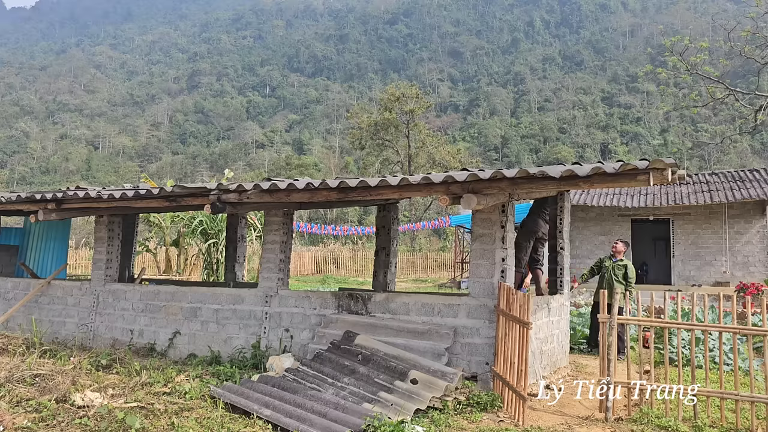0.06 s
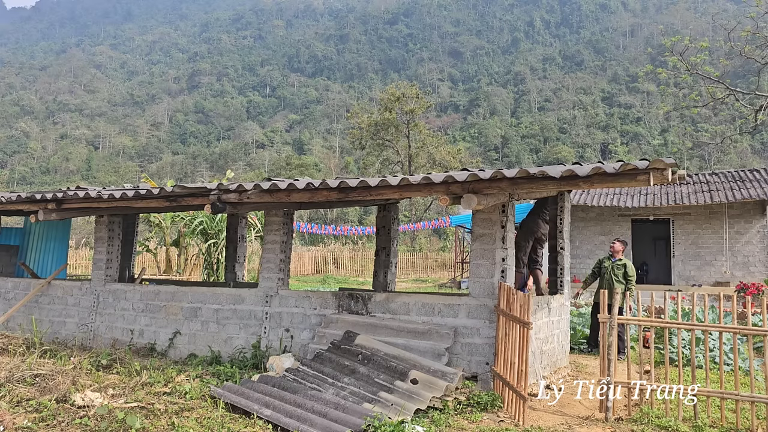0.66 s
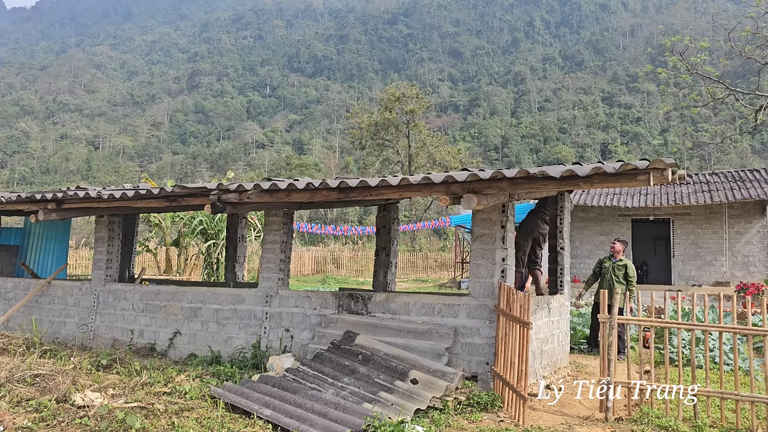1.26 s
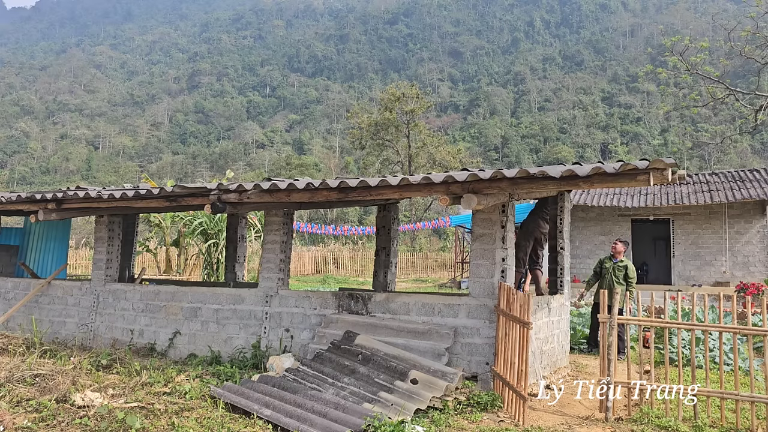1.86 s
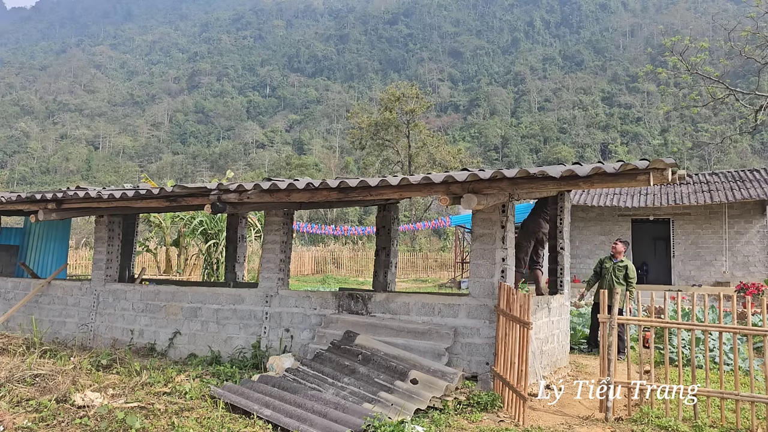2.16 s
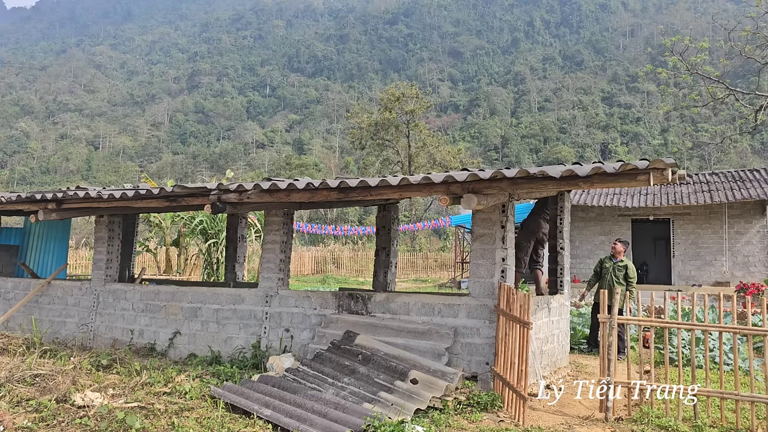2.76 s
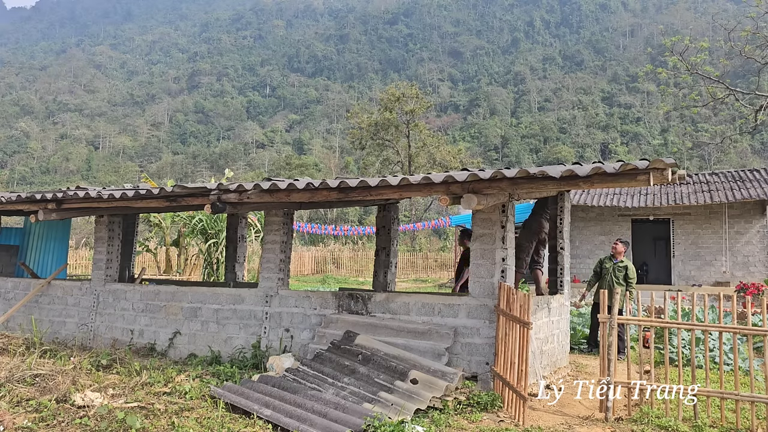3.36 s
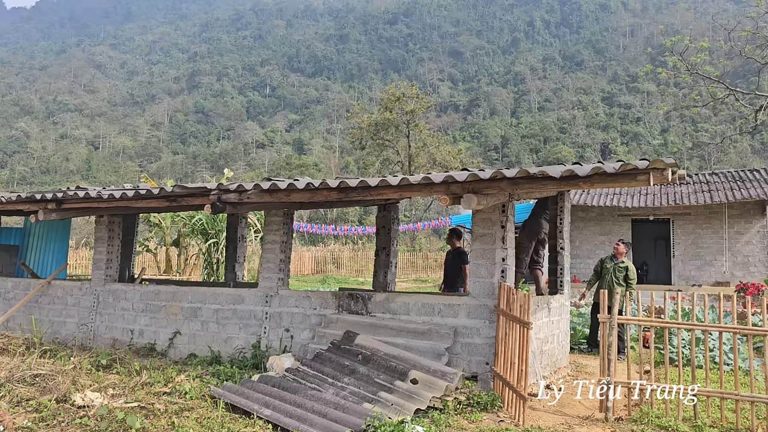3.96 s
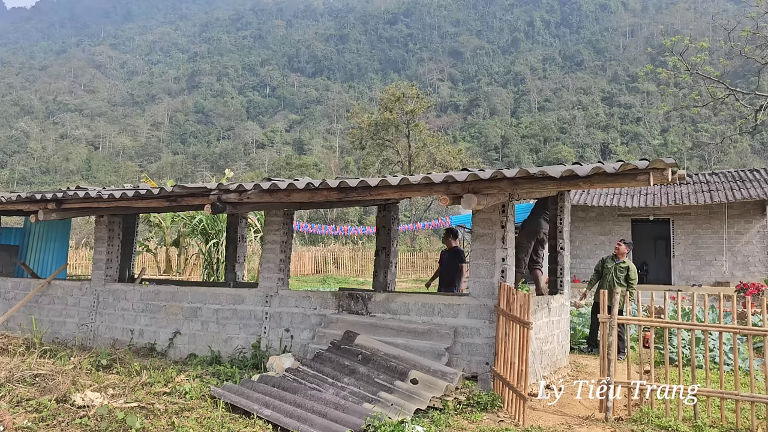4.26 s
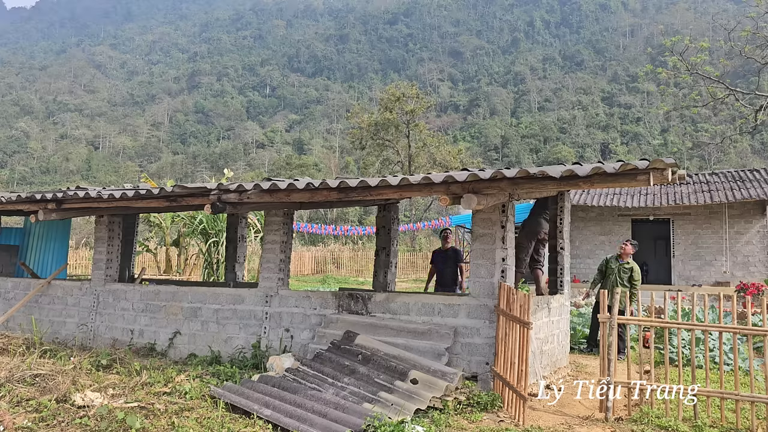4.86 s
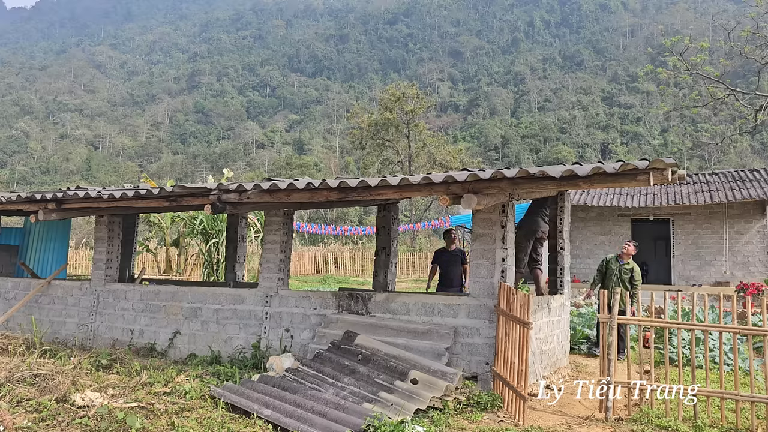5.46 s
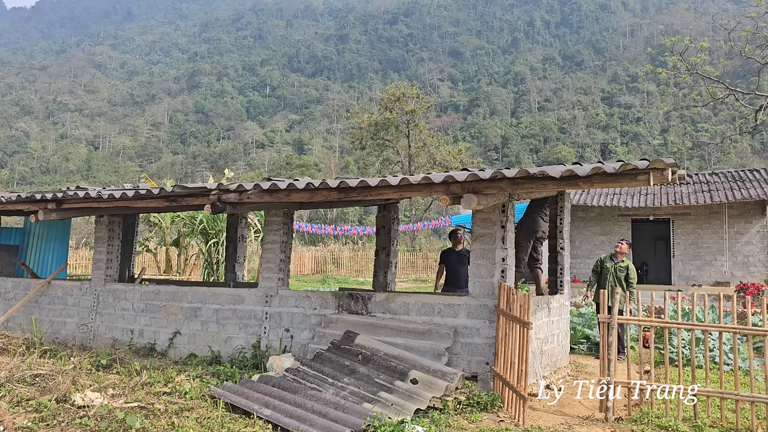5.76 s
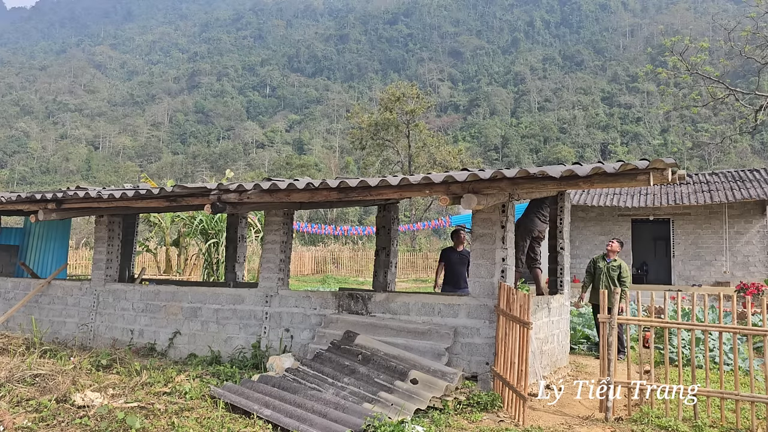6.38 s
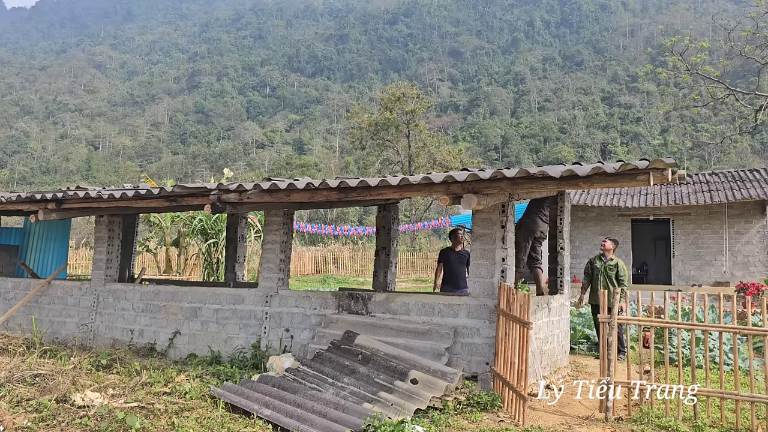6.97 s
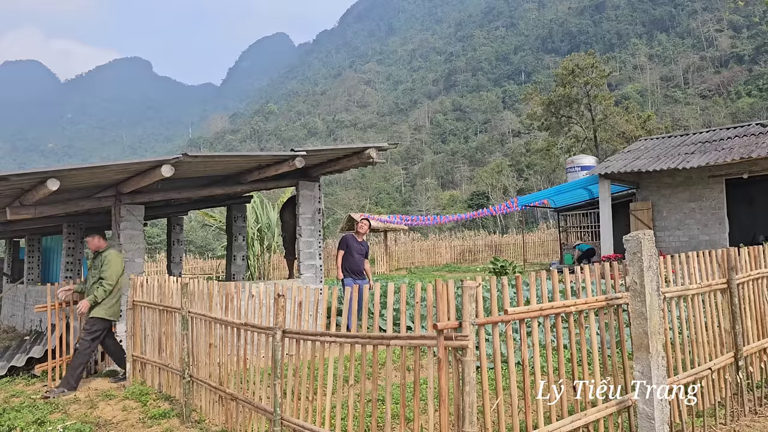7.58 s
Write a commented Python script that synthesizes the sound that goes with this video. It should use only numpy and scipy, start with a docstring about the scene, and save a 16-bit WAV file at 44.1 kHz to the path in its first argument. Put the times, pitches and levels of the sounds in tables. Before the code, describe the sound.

Outdoors on a farm, a light breeze rumbles on the microphone while an animal shifts in a shed, scraping along its pen and bumping the boards. Hollow wooden knocks sound further off in the first half. The loudest thuds come just past the middle, then dry stalks crackle briefly, and more scraping and bumping follows. Small birds trill and whistle faintly throughout.

```python
"""A large farm animal in its shed

The animal shifts about in an open block-walled shed, scraping along the pen and bumping its boards.
A light breeze rumbles on the microphone, and small birds trill and whistle on the hillside.
Hollow wooden knocks ring from further off. Later, dry stalks crackle close by as they snap,
and a thin cry comes from far away."""
import sys
import numpy as np
from scipy import signal
from scipy.fft import rfft, irfft, next_fast_len
from scipy.io import wavfile
from scipy.ndimage import uniform_filter1d

SR = 44100
rng = np.random.default_rng(int(sys.argv[2]) if len(sys.argv) > 2 else 0)


def dump_mix(stems):
    """Bounce the given channels to the path in sys.argv[1] as a 16-bit WAV at rate SR."""
    frames = np.atleast_2d(stems).T  # one column per channel
    limited = np.clip(frames, -1, 1)  # hard clip at full scale
    pcm = np.round(limited * 32767).astype(np.int16)
    wavfile.write(sys.argv[1], SR, pcm)


N = 336105
TIME = np.arange(N) / SR
AGE = np.arange(SR // 2) / SR  # seconds since a short sound began


def from_db(db):
    """Turn decibels into a number to multiply by."""
    return 10 ** (np.asarray(db) / 20)


def rms_one(x):
    """Scale a signal so its average power is 1."""
    return x / np.sqrt(np.mean(x ** 2) + 1e-20)


def in_time(rows):
    """Join a table's timed points into one curve per column."""
    s, *columns = np.transpose(rows)
    return [np.interp(TIME, s, c) for c in columns]


def at_hz(points, hz):
    """Read between a table's points, giving every octave equal room."""
    f, value = np.transpose(points)
    return np.interp(np.log(hz + 1), np.log(f), value)


def drift(rate_hz):
    """A smooth random wander of about 1 either way; a higher rate wanders faster."""
    r = np.exp(-80 * np.pi * rate_hz / SR)
    slow = signal.lfilter([1], [1, -2 * r, r * r], rng.standard_normal(N // 40 + 2002))[2000:]
    return np.interp(np.arange(N) / 40, np.arange(len(slow)), rms_one(slow))


def cut(x, hz, kind, order=2):
    """Keep the "low" or the "high" side of a frequency."""
    return signal.sosfilt(signal.butter(order, hz, kind, fs=SR, output="sos"), x + 1e-18)


def noise(colour, likeness):
    """Stereo noise: colour sets each frequency's level, likeness how alike left and right are."""
    size = next_fast_len(N)
    hz = np.fft.rfftfreq(size, 1 / SR)
    mid, side = rfft(rng.standard_normal((2, size))) * from_db(at_hz(colour, hz))
    alike = np.clip(at_hz(likeness, hz), -1, 1)
    spectrum = np.sqrt(1 + alike) * mid + np.sqrt(1 - alike) * side * [[1], [-1]]
    return rms_one(irfft(spectrum, size)[:, :N])


def panned(x, pan_db, lag=0):
    """Place a sound: positive pan is left, and the left side hears it lag samples late."""
    left, right = x * from_db(np.array([[.5], [-.5]]) * pan_db)
    return np.array([np.interp(np.arange(N) - lag, np.arange(N), left), right])


def resonate(x, modes):
    """Let a sound ring through an object's own notes, given as (f/Hz, width/Hz, level/dB)."""
    out, power = 0, 0
    for k, (hz, width, db) in enumerate(modes):
        r = np.exp(-np.pi * width / SR)
        gain = (-1) ** k * from_db(db) * (1 - r * r) / 2
        feedback = [1, -2 * r * np.cos(2 * np.pi * hz / SR), r * r]
        out = out + signal.lfilter([gain, 0, -gain], feedback, x + 1e-18)
        power += from_db(2 * db) * np.pi * width / SR
    return out / np.sqrt(power)


def burst(decay_s):
    """A loudness curve that starts full and dies away."""
    return np.exp(-np.minimum(AGE / decay_s, 40))


def echoes(x, t60, wet_db, likeness):
    """Add a dull wash of echoes that fades by 60 dB in t60 seconds."""
    wash = noise([(100, 0), (1500, -2), (10000, -10)], likeness)
    tail = (wash * from_db(-60 * TIME / t60))[:, :SR]
    tail /= np.sqrt(np.sum(tail ** 2) / 2)
    return x + from_db(wet_db) * signal.fftconvolve(x * np.ones((2, 1)), tail, axes=-1)[:, :N]


def add(track, s, sound):
    """Mix a short sound into a track, starting at s seconds."""
    part = track[..., max(round(s * SR), 0):][..., :sound.shape[-1]]
    part += sound[..., :part.shape[-1]]


def glide(length_s, first_hz, last_hz, db, bend):
    """One note that swells and fades as its pitch slides; bend multiplies the pitch."""
    along = np.linspace(0, 1, round(length_s * SR))
    pitch = (first_hz + (last_hz - first_hz) * along) * bend[:len(along)]
    arch = np.sqrt(2 * np.abs(np.sin(np.pi * along)))
    return from_db(db) * arch * np.sin(2 * np.pi * np.cumsum(pitch) / SR)


# The wind between gusts: t/s, level/dB, left minus right/dB
LIGHT_WIND = [(0.0, -40.5, 3.5), (0.4, -44, -8.5), (1.0, -43, 2), (1.8, -39, -2.5), (2.2, -44.5, 3),
              (2.6, -38, 4), (3.4, -42, 7), (3.65, -46.5, 4), (4.15, -48, 2.5), (4.5, -43, -2),
              (5.2, -44.5, -8.5), (6.3, -49, -2.5), (7.62, -47, -2)]
# Gusts: peak t/s, level/dB, half length/s, left minus right/dB
GUSTS = [(0.61, -35.5, 0.034, -6), (0.693, -38, 0.08, -5.5), (0.937, -36, 0.042, 3),
         (1.09, -33, 0.026, 2.5), (1.553, -30.5, 0.037, 2.5), (2.44, -37, 0.041, 4),
         (2.819, -36.5, 0.019, 9), (3.243, -39.5, 0.049, 9), (4.858, -35, 0.02, -10.5),
         (4.951, -40, 0.018, -7), (5.335, -38, 0.0068, -11), (5.446, -39, 0.032, -9),
         (5.548, -35.5, 0.028, -8.5), (5.805, -32.5, .055, -8), (6.038, -30, 0.023, -7),
         (6.198, -35.5, 0.04, -7), (6.498, -36.5, 0.045, -10.5), (6.612, -35.5, 0.024, -13),
         (6.842, -36.5, 0.053, -8.5), (7.378, -47.5, 0.096, -13)]
# The wind's deep rumble: f/Hz, level/dB
RUMBLE_COLOUR = [(12, -10), (25, -7.5), (42, 4.5), (68, 2.5), (100, -4.5), (140, -16.5), (200, -26),
                 (300, -45.5), (600, -76)]
def breeze(lull_db=2.44, swing_db=2.5, flutter_db=-12, strong_db=-29):
    """Swirls of air buffet the microphone; strong gusts shed smaller, faster swirls."""
    wind_db, side_db = in_time(LIGHT_WIND)
    wind = panned(from_db(wind_db + lull_db * drift(7)), side_db + swing_db * drift(5))
    for s, db, half_s, pan_db in GUSTS:
        bell = np.exp(-.5 * np.minimum(((TIME - s) / half_s) ** 2, 40))
        wind = np.hypot(wind, panned(from_db(db) * bell, pan_db))
    force = np.sqrt(wind[0] * wind[1]) / from_db(strong_db)
    swirls = noise(RUMBLE_COLOUR, [(25, 0.9), (150, 0.48)])
    power = uniform_filter1d(np.mean(swirls ** 2, axis=0), SR // 14) + 1e-9
    rumble = swirls / np.sqrt(power)  # evened out, so the wind sets the loudness
    flutter = noise([(60, -23.5), (110, 6), (160, -10.5), (250, -17.5), (500, -70.0), (1500, -65)],
                    [(25, 0.63), (150, 0.31)])
    return wind * (rumble + from_db(flutter_db) * force ** 0.58 * flutter)


# The far hiss, which sinks near the end: t/s, level/dB
HISS_LEVEL = [(0, -67), (7.28, -67.5), (7.33, -70)]
# Its tone: f/Hz, level/dB
HISS_COLOUR = [(100, -30), (240, -11), (350, 2), (510, 11.5), (700, 2.5), (1400, 2), (2600, 0.5), (3700, 2),
               (4400, -1), (5200, -4.5), (7600, -4), (9000, -19), (11200, -10), (15000, -13)]
# How alike left and right are outdoors: f/Hz, likeness (0 to 1)
AIR_LIKENESS = [(100, 0.85), (500, 0.17), (1200, 0), (2500, 0.041), (15000, 0)]
def valley(chorus_db=-78.5, chorus_hz=4380, spread_hz=520, flicker_db=4):
    """The countryside hisses, and distant birds chatter, each at its own pitch."""
    hiss_db, = in_time(HISS_LEVEL)
    hiss = from_db(hiss_db) * noise(HISS_COLOUR, AIR_LIKENESS)
    chorus = 0
    for hz in chorus_hz + spread_hz * np.linspace(-.5, .5, 5):
        flicker = from_db(flicker_db * drift(45))
        chorus = chorus + flicker * resonate(rng.standard_normal((2, N)), [(hz, 130, 0)])
    return panned(hiss, pan_db=-2.0) + panned(from_db(chorus_db) * rms_one(chorus), pan_db=-10.5)


# Trills: t/s, length/s, first f/Hz, last f/Hz, level/dB
TRILLS = [(0.0, 0.48, 4130, 4470, -76.5), (1.052, 0.21, 3830, 4560, -77), (1.2, 0.3, 4600, 4570, -74),
          (1.505, 0.22, 4500, 4400, -74.5), (1.761, 0.34, 4360, 4170, -78.5),
          (2.149, 0.16, 4000, 4360, -74), (2.226, 0.36, 3740, 4710, -79), (2.848, .3, 4180, 4520, -79),
          (3.206, .18, 3500, 4570, -86), (3.579, 0.2, 4010, 4500, -73), (3.717, 0.15, 4440, 4270, -78),
          (3.922, .18, 4150, 4270, -81), (4.392, 0.99, 4300, 4150, -79)]
def trilling_bird(boost_db=1.0, pips_per_s=44, pip_fall=.07, pip_width=0.17, stumble=0.2):
    """A bird almost straight ahead sings quick, uneven runs of falling pips."""
    song, wobble = np.zeros(N), 1 + 0.0298 * drift(210)
    for s, *note in TRILLS:
        pip_count = TIME[:SR] * pips_per_s + stumble * drift(14.6)[:SR] + rng.random()
        within = pip_count % 1 - .5  # runs from -0.5 to 0.5 through each pip
        tone = glide(*note, np.roll(wobble, -round(s * SR))[:SR] - pip_fall * within)
        pips = rms_one(np.exp(-.5 * (within[:len(tone)] / pip_width) ** 2))
        add(song, s, tone * pips)
    blurred = echoes(from_db(boost_db) * song, t60=0.3, wet_db=-4.5, likeness=AIR_LIKENESS)
    return panned(blurred, pan_db=-3.5)


# The notes the pen rings at: f/Hz, width/Hz, level/dB
PEN_NOTES = [(115.7, 24, -2.5), (180, 44.5, -6), (250, 56, -2.5), (391.5, 42, -5), (458.4, 106, -1.5),
             (515, 71, 1), (574, 45.5, -3.5), (733, 24, -15.5), (829, 30, -10), (1095, 37, -14.5),
             (1227, 92, -15), (1550, 70, -22), (2060, 41, -18)]
# The gritty rasp of a scrape: f/Hz, level/dB
RASP_COLOUR = [(500, -35), (720, 13.5), (1100, 8.5), (1900, 6.5), (2500, -1.5), (3200, -0.5), (4500, -9),
               (7000, -12.5), (9000, -24), (12000, -27), (15000, -49)]
# How alike left and right are in the shed: f/Hz, likeness (0 to 1)
SHED_LIKENESS = [(250, 0.94), (500, 1), (1000, 0.79), (2000, 0.92), (5000, 0.077)]
# Scrapes: full push t/s, level/dB, swell/s, hold/s, fade/s, rasp/dB, rubbed spot f/Hz, spot/dB
# (rasp and spot are added to the level)
SCRAPES = [(0.01, -54, 0.1, 0.013, 0.16, -16.5, 815, -15), (0.142, -56.5, 0.071, 0.039, 0.1, -12, 510, 0),
           (0.256, -58.5, .03, .01, .05, -15, 1280, -3), (0.304, -54, 0.071, 0.033, 0.095, -13.5, 478, -1),
           (0.398, -52, 0.14, .07, 0.12, -16, 474, -6.5),
           (0.575, -47.5, 0.021, 0.0051, 0.34, -37, 853, -22),
           (1.404, -62.5, 0.098, 0.027, 0.3, -23, 558, -0.5), (1.626, -57, 0.078, .03, .06, -11, 510, -6),
           (1.683, -46, 0.054, 0.025, 0.22, -19, 458, -7),
           (1.998, -52.5, 0.25, 0.074, 0.22, -19.5, 520, -6),
           (2.226, -54, 0.087, 0.12, 0.17, -40.5, 1220, -24),
           (2.552, -60, 0.032, 0.028, 0.21, -32, 660, -6.5), (3.187, -69.5, 0.1, 0.12, 0.19, -30, 687, -14),
           (3.818, -51.5, 0.069, 0.095, 0.073, -26, 424, -6),
           (4.258, -46, 0.2, 0.14, 0.2, -15.5, 262, -3.5),
           (4.354, -41.5, 0.018, 0.016, 0.082, -16, 890, -3),
           (4.464, -42.5, 0.027, 0.026, 0.093, -16, 1320, -17.5),
           (4.567, -48, .012, 0.012, 0.12, -18, 910, -10), (6.038, -47, 0.14, 0.14, 0.11, -14.5, 835, -9.5),
           (6.22, -43, 0.14, 0.05, 0.066, -12.5, 248, -8), (6.26, -48, 0.19, 0.089, 0.1, -13.5, 2300, -24),
           (6.651, -44.5, 0.077, 0.11, 0.18, -9.5, 750, -9.5),
           (6.741, -41.5, 0.12, 0.055, 0.15, -10, 513, -3),
           (7.115, -57.5, 0.15, 0.026, 0.063, -9, 1290, -13),
           (7.22, -50.5, 0.12, 0.062, 0.041, -7, 2790, -13)]
def scraping(boards_db=3.0, rasp_db=4.5, rasp_growth=1.37, drop_db=17.5, muffle_hz=2600):
    """Uneven rubbing shakes the pen; each spot has its own pitch, and hard pushes add a rasp."""
    slips = rms_one(from_db(-0.36 * drift(130) + 2.05 * drift(14)))  # fine grain and slower catches
    friction = noise([(100, 13.5), (700, 0), (3000, -12.5)], SHED_LIKENESS)
    boards = 0
    for k, (hz, width, db) in enumerate(PEN_NOTES):
        # the moving point of contact favours now one note, now another
        share = from_db(db + 1.8 * drift(6.3)) * np.sqrt(width) * (-1) ** k
        boards = boards + share * resonate(friction, [(hz, width, 0)])
    effort, scrape, spots = from_db(-74.5), from_db(-82 - rasp_db), 0  # faint stirring at rest
    contact = noise([(100, 0), (3000, 0)], SHED_LIKENESS)
    for s, db, swell_s, hold_s, fade_s, bright_db, spot_hz, spot_db in SCRAPES:
        away = np.maximum((s - TIME) / swell_s, (TIME - s - hold_s) / fade_s)
        shape_db = -drop_db * np.clip(away, 0, 5) ** 0.94  # swell, hold, fade
        effort = np.hypot(effort, from_db(db + shape_db))
        scrape = np.hypot(scrape, from_db(db + bright_db + rasp_growth * shape_db))
        spot = [(spot_hz, 0.14 * spot_hz, 0)]
        spot_sound = rms_one(resonate(resonate(contact, spot), spot))
        spots = spots + from_db(db + spot_db + shape_db) * spot_sound
    grit = noise(RASP_COLOUR, SHED_LIKENESS)
    # scrapes with little rasp sound dull; raspier ones keep their bright top
    raspiness = np.minimum(scrape / effort / from_db(-12), 1)
    dull_grit = cut(grit, muffle_hz, "low", order=1)
    rasp = from_db(rasp_db) * scrape * (raspiness * grit + (1 - raspiness) * dull_grit)
    shake = from_db(boards_db) * effort * rms_one(cut(boards, 164, "high"))
    return slips * (shake + spots) + panned(rasp, pan_db=-0.5)


# Bumps, from dull thud to sharp knock:
# t/s, level/dB, brightness/Hz, rattle decay/s, board f/Hz, board ring/dB
BUMPS = [(0.01, -43, 900, 0.01, 505, 5), (0.438, -41, 1190, 0.0063, 490, 7),
         (0.578, -32, 730, 0.031, 515, 18), (0.583, -39.5, 900, 0.0091, 850, 21.5),
         (0.606, -30.5, 300, 0.012, 201, 22.5), (0.755, -48, 650, 0.014, 530, 10),
         (1.7, -27.5, 640, 0.016, 480, 15.5), (1.707, -27.5, 575, 0.018, 473, 20.5),
         (2.349, -36, 300, 0.016, 540, 13), (4.209, -32.5, 1096, 0.013, 504, 7),
         (4.245, -34.5, 1800, 0.011, 530, 11), (4.338, -27.5, 1000, 0.026, 800, 13),
         (4.3573, -19.5, 1050, 0.017, 518, 19.5), (4.444, -17.5, 212, 0.047, 243, 15),
         (4.478, -34, 704, 0.019, 506, 6), (4.567, -33.5, 1000, 0.014, 587, 13),
         (6.21, -27, 250, .015, 250, 17), (6.339, -33, 670, 0.035, 460, 12),
         (6.633, -38.5, 1200, 0.016, 590, 10), (6.764, -29, 1000, 0.013, 483, 22.5),
         (7.213, -36, 1000, 0.015, 497, 12), (7.265, -28, 1300, 0.012, 560, 4)]
def bumps(thump_db=17, rattle_db=-5, ring_width_hz=95, muffle_hz=2300):
    """Each bump bends one board, which rings, and rattles the pen; each has its own brightness."""
    force, ring = np.zeros(N), np.zeros(N)
    for s, db, bright_hz, decay_s, board_hz, board_db in BUMPS:
        click_and_noise = np.array([AGE == 0, rng.standard_normal(len(AGE)) * burst(decay_s)])
        push, rattle = from_db(db) * cut(click_and_noise, bright_hz, "low", order=1)
        add(force, s, from_db(thump_db) * push + from_db(rattle_db) * rattle)
        add(ring, s, from_db(board_db) * resonate(push, [(board_hz, ring_width_hz, 0)]))
    shake = cut(resonate(force, PEN_NOTES) + ring, 92, "high")
    return echoes(cut(shake, muffle_hz, "low"), t60=0.48, wet_db=-13.0, likeness=SHED_LIKENESS)


# The nearer whistles: t/s, length/s, first f/Hz, last f/Hz, level/dB, raspiness (0 to 1)
WHISTLES = [(0.05, 0.12, 3100, 3100, -74, 0.6), (0.405, 0.19, 3260, 2860, -74, 0.4),
            (0.64, 0.12, 2680, 2260, -86, 0.05), (0.785, 0.12, 2300, 1980, -82, 0),
            (0.975, 0.1, 2580, 2220, -76, 0), (1.01, 0.053, 3180, 3050, -81, 0),
            (1.044, 0.035, 5530, 4600, -79, 0), (1.222, 0.032, 3920, 3550, -74, 0.8),
            (1.265, 0.1, 2780, 2200, -77, 0.1), (1.28, 0.065, 3000, 3160, -77, 0.4),
            (1.327, 0.075, 3220, 2840, -68.5, 0.16), (1.438, 0.026, 6360, 6280, -74, 0.15),
            (1.484, 0.018, 3850, 3720, -73, 0.3), (1.524, 0.021, 3740, 3620, -67.5, .4),
            (1.52, 0.058, 3560, 3100, -71, 0.5), (1.52, 0.065, 2700, 2170, -80, 0.2),
            (1.58, 0.053, 2180, 2170, -74, 0.2), (1.574, 0.011, 3600, 3930, -69, 0.5),
            (1.595, 0.1, 3460, 3410, -70, 0.24), (1.682, .016, 3450, 2880, -74, .1),
            (1.756, 0.022, 3660, 3880, -74, 0.5), (1.91, 0.058, 2480, 2200, -81, 0.1),
            (1.96, 0.025, 3740, 3840, -71, 0.25), (2.24, 0.08, 3000, 2250, -83, 0),
            (2.44, 0.15, 2780, 2300, -84, 0.1), (2.59, 0.16, 3130, 3230, -87, 0),
            (3.31, 0.072, 2480, 2170, -86, 0.2), (3.55, 0.061, 3110, 2980, -75.5, 0.03),
            (3.68, 0.18, 3300, 3200, -77.5, 0.4), (3.82, 0.095, 3500, 3550, -80, 0),
            (3.91, 0.057, 3800, 3940, -88, 0.1), (4.01, 0.07, 3460, 3480, -78, 0),
            (4.08, 0.12, 3220, 3460, -81, 0.2), (4.555, 0.075, 5600, 4670, -86, 0.03),
            (4.782, 0.12, 3440, 3250, -80, 0.22), (4.89, 0.02, 5370, 5320, -79, 0.4),
            (5.03, 0.12, 2650, 2310, -82, 0.2), (5.26, 0.14, 3240, 3400, -80, 0.06),
            (5.424, 0.017, 3460, 2160, -71, 1), (5.655, 0.037, 5460, 6540, -76, 0.4),
            (5.727, 0.026, 5760, 4470, -73, 0.1), (5.935, 0.072, 3250, 3210, -78, 0.12),
            (6.47, 0.11, 3450, 3370, -82.5, 0), (7.02, .14, 3300, 2980, -88, 0.2),
            (7.35, 0.15, 3540, 3370, -89, 0)]
def whistling_birds(boost_db=4.0, waver=0.0046, rasp_depth=0.049, flutter_db=2.5):
    """Birds far to the right whistle sliding notes, blurred by the wooded slope."""
    song, wobble, buzz = np.zeros(N), 1 + waver * drift(52), rasp_depth * drift(207)
    for s, *note, raspy in list(WHISTLES) + far_whistles():
        add(song, s, glide(*note, np.roll(wobble + raspy * buzz, -round(s * SR))))
    song *= from_db(boost_db + flutter_db * drift(39))
    blurred = echoes(song, t60=0.42, wet_db=-10, likeness=AIR_LIKENESS)
    return panned(blurred, pan_db=-11.0, lag=10.2)


def far_whistles(per_s=3.3, length_s=0.12, middle_hz=3570, db=-87, raspy=0.16):
    """Extra rows of faint whistles from further up the slope, with random timing, pitch and slide."""
    notes = []
    for k, (late, pitch, slide) in enumerate(rng.uniform(-1, 1, size=(40, 3))):
        s = (k + .5 + late / 2) / per_s
        hz = middle_hz * 2 ** (0.26 * pitch)
        if s < TIME[-1]:
            notes.append((s, length_s, hz, hz * 2 ** (0.13 * slide), db, raspy))
    return notes


# The notes of the knocked wood: f/Hz, width/Hz, level/dB
WOOD_NOTES = [(447, 96, 2), (684, 36, 8.5), (775, 78, 2.5), (1000, 114, 1.5), (1087, 35, 3),
              (1290, 160, -2.5), (1730, 36, -4)]
# Knocks: t/s, level/dB, lingering ring/dB, ring f/Hz, brightness/Hz
KNOCKS = [(1.322, -46, -25, 890, 1500), (1.487, -45.5, -24, 900, 1810), (2.311, -49, -16, 825, 1800),
          (2.368, -42.5, -12.5, 880, 1800), (2.553, -55.5, -11, 800, 1600), (2.640, -50.5, -7, 810, 1300),
          (2.886, -48, -5.5, 890, 1600), (3.162, -49.5, -2.5, 917, 1090), (4.053, -44, -8, 904, 1490),
          (5.823, -53.5, -20, 890, 1600)]
def knocks(strike_db=19, scatter_db=-3.5, ring_s=0.34, rise_s=0.0038, sag_per_s=0.58, twin_ratio=0.89):
    """A sharp strike on wood, scattered by walls, leaves two close, hollow notes that waver and sink."""
    strikes, notes = np.zeros((2, N)), np.zeros(N)
    ring_shape = burst(ring_s / np.log(1000)) - burst(rise_s)
    for s, db, linger_db, hz, bright_hz in KNOCKS:
        scatter = from_db(scatter_db) * rng.standard_normal((2, len(AGE))) * burst(0.013)
        force = scatter + from_db(strike_db) * (AGE == 0)
        add(strikes, s, from_db(db) * cut(resonate(force, WOOD_NOTES), bright_hz, "low", order=4))
        cycles = hz * np.cumsum(1 - sag_per_s * AGE + 0.017 * drift(120)[:len(AGE)]) / SR
        twin = from_db(-11) * np.sin(2 * np.pi * (twin_ratio * cycles + rng.random()))
        pair = np.sin(2 * np.pi * cycles) + twin
        add(notes, s, from_db(db + linger_db - 3) * ring_shape * pair)
    flicker = from_db(5.0 * drift(64))
    return echoes(strikes + notes * flicker, t60=0.21, wet_db=-8.0, likeness=AIR_LIKENESS)


# Runs of snaps: t/s, level/dB, run length/s, snap decay/s, lowest f/Hz
SNAP_RUNS = [(4.87, -57, 0.0039, .009, 11000), (4.983, -65.5, .005, 0.027, 4500),
             (5.028, -51, 0.05, 0.011, 5800), (5.113, -59, .005, .01, 7000),
             (5.155, -51, 0.031, 0.0074, 5200), (5.404, -63, 0.21, 0.02, 9700),
             (5.724, -54, .005, 0.014, 6000), (5.763, -64.5, 0.074, 0.011, 5740)]
def stalks(gap_s=0.021, rise_s=0.0014, run_loss_db=6):
    """Dry stalks give way in runs of snaps, each a tiny shower of bright splinters."""
    splinters = noise([(2500, -12), (4500, 11.0), (5600, 13.0), (7500, 10.5), (9200, -3),
                       (11300, 6.0), (15000, -24)], AIR_LIKENESS)
    snaps = np.zeros((2, N))
    for start, db, run_s, decay_s, low_hz in SNAP_RUNS:
        shape = burst(decay_s) - burst(rise_s)  # builds up as the fibres tear one after another
        for after, (late, chance_db) in zip(np.arange(0, run_s, gap_s), rng.standard_normal((40, 2))):
            s = start + after + 0.17 * late * min(after, gap_s)
            shower = cut(splinters[:, round(s * SR):][:, :len(AGE)], low_hz, "high")
            add(snaps, s, from_db(db - run_loss_db * after / run_s + chance_db) * shape * shower)
    return echoes(panned(snaps, pan_db=-6.5, lag=9.2), t60=0.15, wet_db=-4.5, likeness=AIR_LIKENESS)


# The cry's two notes: t/s, length/s, first f/Hz, last f/Hz, level/dB
CRY_NOTES = [(5.03, 0.24, 930, 1090, -80), (5.419, 0.207, 1183, 1110, -79.5)]
def far_cry(waver=0.018):
    """A thin cry, perhaps a rooster, rises and then sinks far down the valley."""
    cry, wobble = np.zeros(N), 1 + waver * drift(90)
    for s, *note in CRY_NOTES:
        add(cry, s, glide(*note, np.roll(wobble, -round(s * SR))))
    return echoes(cry, t60=0.36, wet_db=-5, likeness=AIR_LIKENESS)


def scene():
    """Mix everything, with the shed a little to the right."""
    shed = panned(scraping() + bumps(), pan_db=-1.1, lag=4.14)
    farm = shed + panned(knocks(), pan_db=-1.7, lag=2.4) + stalks()
    return farm + whistling_birds() + trilling_bird() + far_cry() + breeze() + valley()


def record(dry, top_hz=15500):
    """Cut away the very highest treble."""
    return signal.sosfilt(signal.ellip(12, .1, 80, top_hz, fs=SR, output="sos"), dry)


dry = scene()
out = record(dry)
dump_mix(out)
```